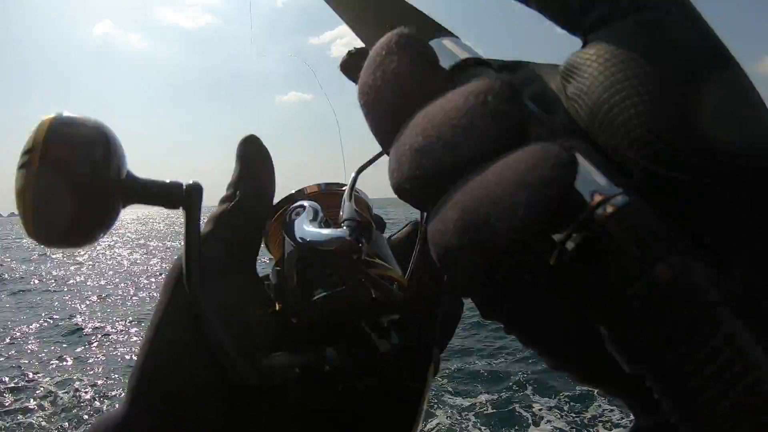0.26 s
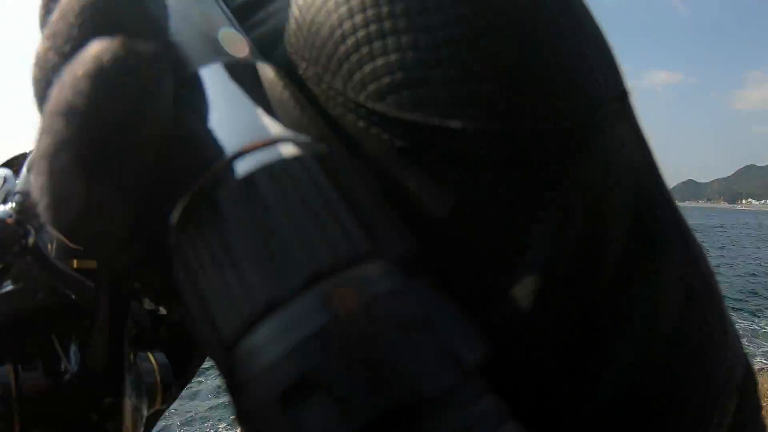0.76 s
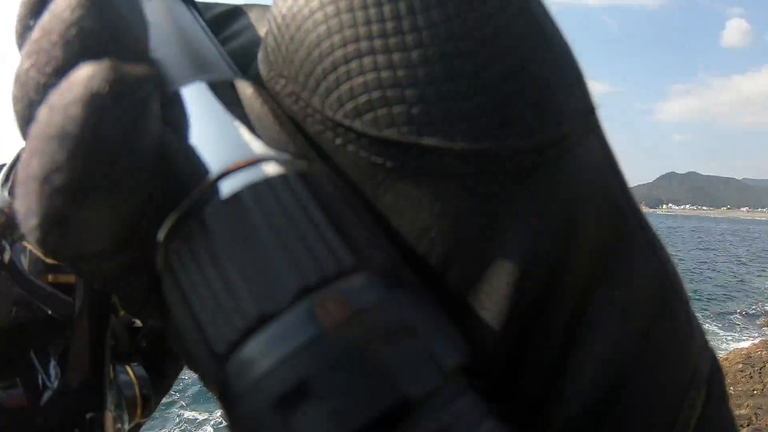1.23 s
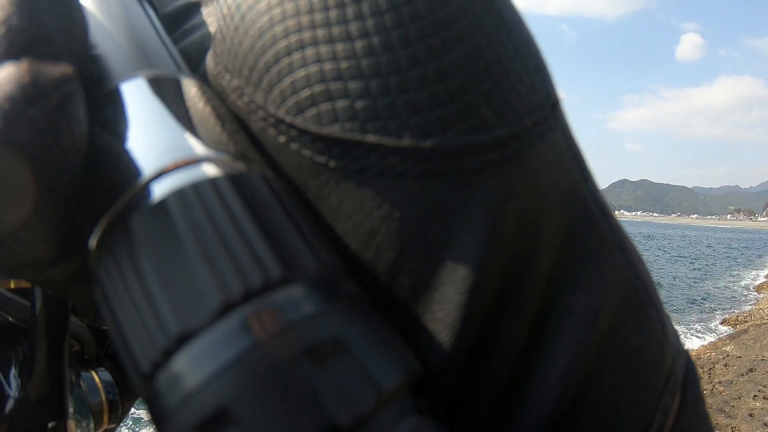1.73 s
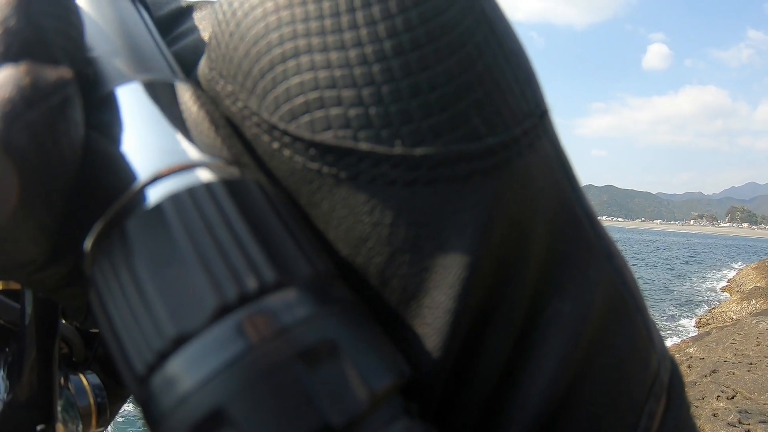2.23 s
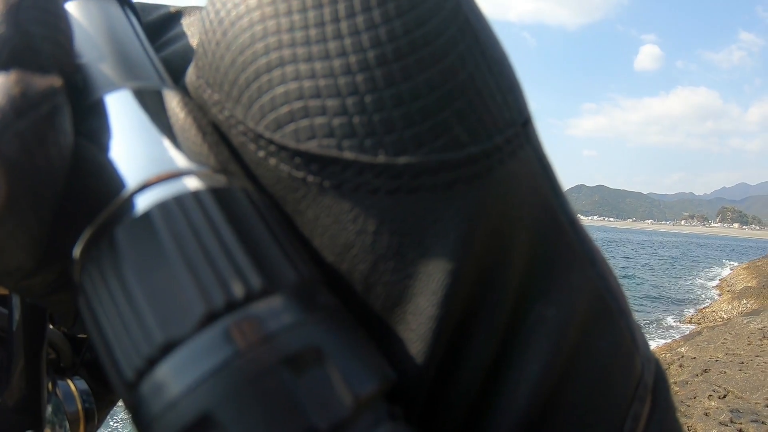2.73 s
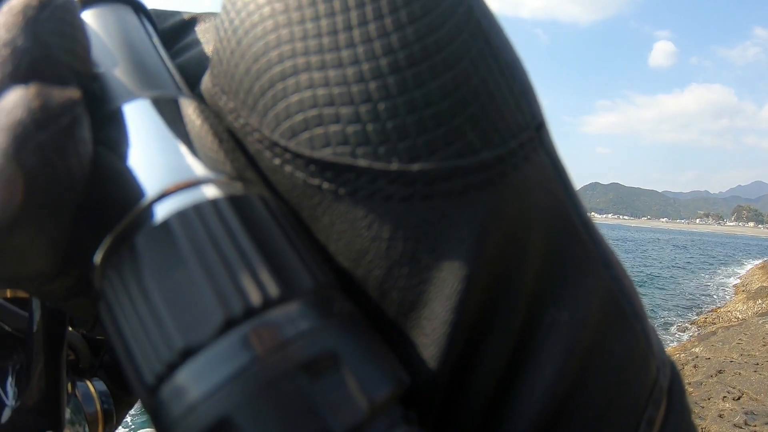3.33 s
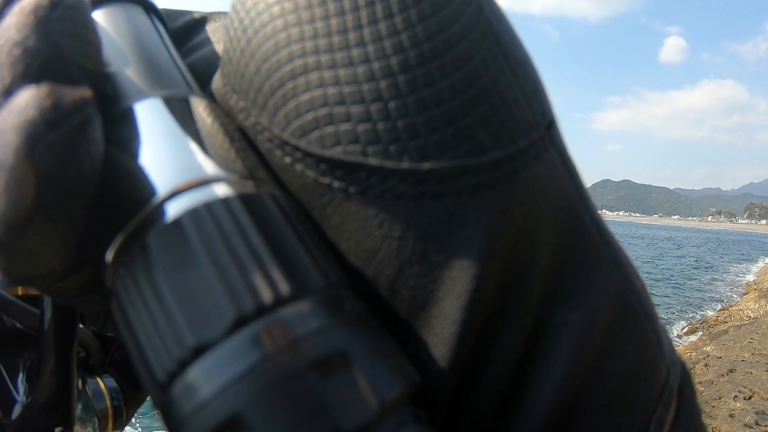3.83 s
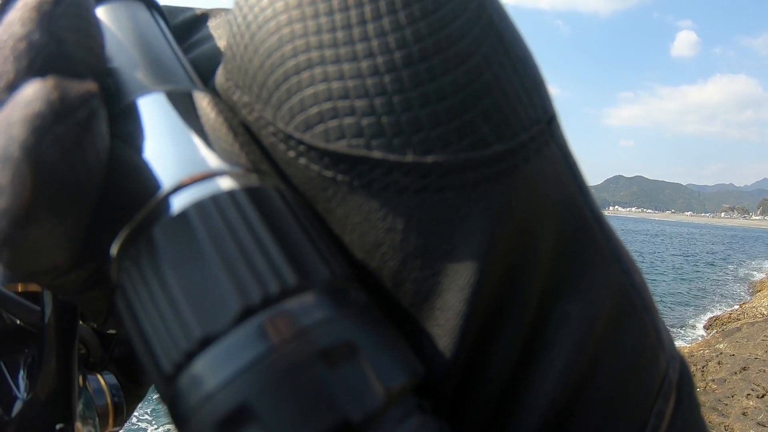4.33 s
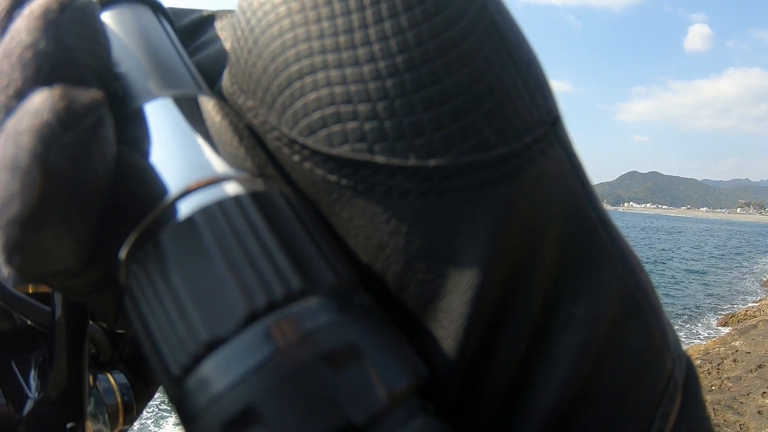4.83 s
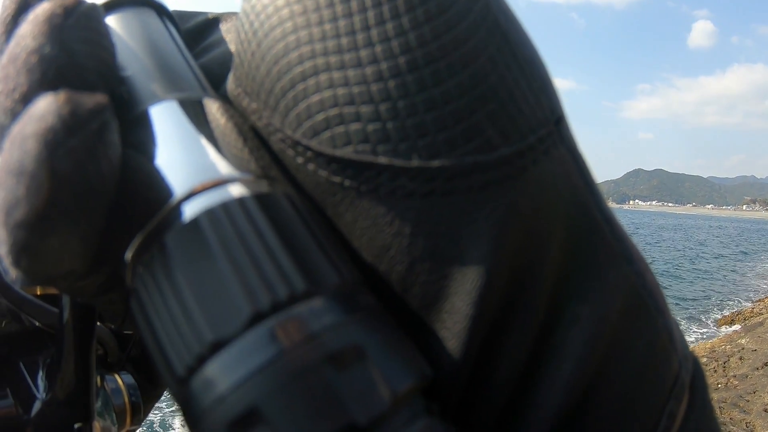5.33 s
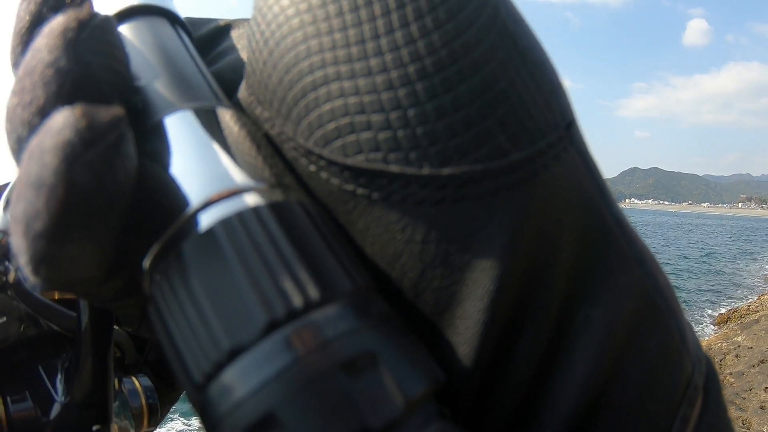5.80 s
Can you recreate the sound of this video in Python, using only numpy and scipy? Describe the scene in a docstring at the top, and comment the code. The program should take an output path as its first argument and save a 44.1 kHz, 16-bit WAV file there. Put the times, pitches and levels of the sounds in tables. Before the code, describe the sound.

Close, hollow knocks rattle the casing of a small body-worn camera as a fishing rod bumps it, ending in one hard blow with a faint metallic ring. Then surf dominates: a low watery roar, soft wash and fine fizz, with gurgles and round plops in rock hollows. It swells fullest midway, then eases. Wind buffets the microphone in low, uneven lumps throughout.

```python
"""Surf washes over a rocky shore: filtered noise layers under level curves, with chirping bubbles.
A fishing rod knocks on a small body-worn camera with two microphone ports: damped housing modes.
A metal part of the reel rings after the hardest knock, and wind buffets the ports with low noise.
A limiter briefly ducks the whole sound after hard blows.
"""
import sys
import numpy as np
from scipy import signal
from scipy.fft import rfft, irfft, next_fast_len
from scipy.io import wavfile
from scipy.ndimage import uniform_filter1d

SR = 44100
rng = np.random.default_rng(int(sys.argv[2]) if len(sys.argv) > 2 else 0)


def persist_wave(psi):
    """Save psi, clipped to +-1, as 16-bit WAV."""
    counts = np.round(np.clip(psi, -1, 1) * 32767).astype(np.int16)
    wavfile.write(sys.argv[1], SR, np.atleast_2d(counts).T)


N = 267246  # samples

# Spectra of roar, wash, foam fizz and spray: (frequency [Hz], relative density [dB])
ROAR_COLOUR = [(60, -38), (130, -1.5), (200, 1.5), (300, -2), (400, -1.5), (520, -2), (640, -9.5),
               (780, -15), (1000, -23), (1600, -31.5), (4000, -100)]
WASH_COLOUR = [(200, -57), (600, 5), (900, 3), (1200, -6), (1500, -5), (1900, -8), (2300, -15.5),
               (2900, -17.5), (3600, -21), (4400, -33), (9000, -79)]
FIZZ_COLOUR = [(1500, -61), (3000, -3), (4500, -2.5), (5500, 1.5), (6700, 3.5), (7600, -3.5), (8700, -19.5),
               (10800, -26), (16000, -87)]
SPRAY_COLOUR = [(3000, -49), (7000, -8.5), (8700, -5.5), (10800, -15), (13400, -23), (15500, -30)]
# Opening and closing of the roar's upper edge: (time [s], lift [dB])
ROAR_EDGE = [(0, 5), (.6, 3.5), (1.1, -3), (1.6, -1), (2.1, -0.5), (2.5, 3), (2.75, -0.5), (3.1, -0.5),
             (3.5, -4), (4.0, 0.5), (4.5, -1), (4.9, 3), (5.3, 3), (5.6, 2), (6.06, 1.5)]
# Share of the slap lift taken by roar, wash, fizz, spray [1]
SLAP_SHARES = [0.81, 0.58, 0.59, 0.91]
ROAR_EDGE_HZ = (540, 950)
FLICKER_RMS_DB = (0.99, 0.75, 0.97, 1.0)  # roar, wash, fizz, spray


def surf():
    """Breaking water as four noise bands, all lifted by the same splashes by their own shares."""
    roar = noise(ROAR_COLOUR, size=1024, patchy_db=1.0, patch_s=0.04, patch_hz=250)
    edge = signal.lfilter(*signal.butter(2, ROAR_EDGE_HZ, "band", fs=SR), roar)
    roar = roar + (gain_of(level_db(ROAR_EDGE, col=1)) - 1) * edge
    wash = noise(WASH_COLOUR, size=512, patchy_db=1.26, patch_s=0.036, patch_hz=700)
    fizz = noise(FIZZ_COLOUR, size=256, patchy_db=1.5, patch_s=0.026, patch_hz=1500)
    spray = noise(SPRAY_COLOUR, size=256, patchy_db=1.0, patch_s=0.047, patch_hz=1500)

    slaps_db, flicker = splashes()
    sea = np.zeros((2, N))
    layers = zip((roar, wash, fizz, spray), swells_db(), SLAP_SHARES, FLICKER_RMS_DB)
    for layer, swell_db, slap_share, flicker_db in layers:
        sea += layer * gain_of(swell_db + slap_share * slaps_db + flicker_db * flicker)
    return sea


# Swell of the sea: (time [s], roar level [dB], wash level [dB], fizz level [dB])
SURF = [(0.0, -36.5, -46.5, -56.5), (0.11, -35, -47.5, -56), (0.2, -31, -48, -59),
        (0.34, -30.5, -45.5, -55), (0.462, -43, -54.5, -65), (0.6, -35, -52.5, -66),
        (0.76, -38.5, -55.5, -69.5), (0.88, -35, -52, -68), (1.06, -40.5, -56.5, -69),
        (1.28, -38, -53.5, -65), (1.65, -36, -50, -62.5), (1.9, -38, -52.5, -65), (2.27, -38, -53, -67),
        (2.45, -35.5, -51, -62.5), (2.56, -36.5, -49.5, -61), (2.7, -36.5, -48.5, -60.5),
        (2.8, -35, -47.5, -61.5), (3.0, -30.5, -46.5, -56), (3.15, -31, -45.5, -55.5),
        (3.55, -29, -43, -52), (3.9, -33, -48.5, -58), (4.07, -36, -50, -58.5), (4.2, -32.5, -49.5, -61.5),
        (4.32, -37.5, -51, -63.5), (4.64, -37.5, -53.5, -64), (4.8, -37, -51, -63.5),
        (4.93, -34.5, -46.5, -58), (5.18, -35.5, -48.5, -58.5), (5.3, -36, -49, -59),
        (5.54, -36.5, -51, -62.5), (5.88, -35, -55, -65.5), (6.06, -40, -55, -66.5)]
# Heavier lumps of water landing, in the roar:
# (peak time [s], lift, negative = dip [dB], 1/e half length [s])
LUMPS = [(0.851, 4, 0.026), (1.547, 3, 0.055), (1.656, 6, 0.014), (2.016, 1.5, 0.026), (2.335, 6, 0.0097),
         (2.507, -4, 0.0068), (2.622, 6, 0.042), (2.747, 6, 0.018), (2.834, 9, 0.01), (2.92, 4, 0.027),
         (3.161, 9, 0.015), (3.405, 2.5, 0.15), (3.79, 4.5, 0.05), (4.024, 3.5, 0.038), (4.132, 5.5, 0.012),
         (4.347, 7.5, 0.013), (4.883, 2, 0.017), (5.116, -1, 0.048)]
SPRAY_DB, SPRAY_PER_FIZZ, MEAN_FIZZ_DB = -76, 1.23, -63.5  # spray swings more than the fizz
COVER_S, COVER_LENGTH_S, OPEN_DB = 0.75, 0.1, 4.5  # spray lift until a gloved hand shades the ports


def swells_db():
    """Levels of roar, wash, fizz and spray as the waves break."""
    t = np.arange(N) / SR
    roar, wash, fizz = (level_db(SURF, col=k) for k in (1, 2, 3))
    lumps = sum(db * np.exp(-((t - s) / length_s) ** 2) for s, db, length_s in LUMPS)
    unshaded = OPEN_DB * np.clip((COVER_S - t) / COVER_LENGTH_S + 0.5, 0, 1)
    spray = SPRAY_DB + SPRAY_PER_FIZZ * (fizz - MEAN_FIZZ_DB) + unshaded
    return roar + lumps, wash, fizz, spray


# Small slaps of water on rock, peaking half a length after the start:
# (start [s], lift before the layer's share, negative = dip [dB], length [s])
SLAPS = [(0.771, 4, 0.01), (1.137, 7.5, 0.011), (1.249, 6.5, 0.017), (2.291, 9.5, 0.013),
         (2.32, 4.5, 0.011), (2.47, 2.5, 0.018), (2.507, 1.5, 0.028), (2.516, 4.5, 0.016),
         (2.578, 3, 0.0097), (2.66, 4, 0.026), (2.72, 3.5, 0.013), (2.87, 3.5, 0.0088), (3.081, 4.5, 0.022),
         (3.213, 3.5, 0.0045), (3.351, 5.5, 0.0095), (3.602, 3.5, 0.0058), (4.052, -3, 0.0058),
         (4.43, 7, 0.012), (4.501, 8, 0.011), (4.67, -4, 0.0092), (5.028, 5, 0.016), (5.46, 1.5, .012)]


def splash_shape(u):
    """Quick rise to 1 at u = 1, slower fall."""
    u = np.maximum(u, 0)
    return u * np.exp(1 - u)


def splashes(per_s=76.0, rise_s=0.0032):
    """Slap lifts in dB, and an rms-1 flicker of random small splashes, common to all layers."""
    t = np.arange(N) / SR
    slaps_db = sum(db * splash_shape(2 * (t - s) / length_s) for s, db, length_s in SLAPS)
    drops = rng.uniform(0.16, 2.9, N) * (rng.random(N) < per_s / SR)
    flicker = signal.oaconvolve(drops, splash_shape(t[:SR // 10] / rise_s))[:N]
    return slaps_db, evened(flicker - flicker.mean())


# Single plops in hollows of the rock: (time [s], level [dB], starting pitch [Hz])
PLOPS = [(0.837, -29, 369), (0.869, -37, 394), (1.135, -42, 528), (1.474, -25.5, 368), (1.559, -23.5, 370),
         (2.317, -26.5, 480), (2.464, -25, 440), (2.508, -18.5, 460), (2.594, -23, 520),
         (2.624, -20.5, 424), (2.668, -22.5, 566), (2.686, -22, 520), (2.717, -19, 510), (2.754, -28, 397),
         (2.968, -28, 353), (3.15, -23, 457), (3.33, -29, 437), (3.511, -25, 465), (4.041, -35, 552),
         (4.138, -25, 348), (4.19, -31, 433), (4.244, -21.5, 357), (4.309, -22, 390), (4.344, -36, 470),
         (4.514, -25.5, 363), (4.658, -33, 560), (4.715, -27, 387), (4.839, -42, 388), (4.889, -26, 463),
         (4.919, -24, 430), (5.278, -47, 395), (5.323, -29, 460)]
# Splashes bursting into small bubbles:
# (start [s], level of one bubble [dB], centre starting pitch [Hz], length [s])
BURSTS = [(0.608, -47, 1700, .04), (1.234, -50, 1900, 0.043), (2.292, -51, 1500, .03),
          (2.47, -54, 1600, .04), (2.51, -38, 1390, .022), (2.653, -43, 1500, .05), (2.868, -47, 1500, .05),
          (3.073, -48, 1500, .06), (3.32, -48, 1600, .06), (4.12, -49, 1700, .1), (4.83, -41, 1220, .06),
          (4.9, -56, 1700, 0.11), (5.02, -55, 2200, .04), (5.16, -49, 1910, .03), (5.205, -51, 1600, .03),
          (5.31, -49, 1700, 0.035), (5.54, -49, 1200, .04)]
BURST_BUBBLES, BURST_OCTAVES = 14, 0.6  # bubbles per burst, pitch spread each way
GURGLES_PER_S, GURGLE_DB, GURGLE_HZ = 120, -11, (328.3, 800)  # dB re roar swell
FIZZLES_PER_S, FIZZLE_DB, FIZZLE_HZ = 200, -10, (900, 3300)  # dB re wash swell


def gurgles():
    """Air bubbles: scattered ones follow roar and wash; plops and bursts come at set times."""
    roar_db, wash_db = swells_db()[:2]
    large = scattered(GURGLES_PER_S, *GURGLE_HZ) * gain_of(roar_db + GURGLE_DB)
    small = scattered(FIZZLES_PER_S, *FIZZLE_HZ) * gain_of(wash_db + FIZZLE_DB)
    water = (large + small)[None]
    for s, db, hz in PLOPS:
        add(water, s, gain_of(db) * bubble(hz)[None])
    for s, db, centre_hz, length_s in BURSTS:
        for late, high in rng.random((BURST_BUBBLES, 2)):
            hz = centre_hz * 2 ** (BURST_OCTAVES * (2 * high - 1))
            add(water, s + late * length_s, gain_of(db) * bubble(hz)[None])

    size = next_fast_len(N)
    left = left_port(np.fft.rfftfreq(size, 1 / SR))
    middle = abs(1 + left) / 2  # levels refer to the mean of both ports
    return irfft(rfft(water, size) * [left / middle, 1 / middle], size)[:, :N]


GURGLE_SPREAD_DB = 2.5  # scale of the exponential spread


def scattered(per_s, low_hz, high_hz):
    """Bubbles of random strength and pitch at random moments, lower ones louder, rms 1."""
    spread_db = GURGLE_SPREAD_DB * np.minimum(rng.exponential(1, N), 4)
    strikes = gain_of(spread_db) * (rng.random(N) < per_s / SR)
    kind = rng.integers(0, 16, N)
    out = np.zeros(N)
    for k, hz in enumerate(np.geomspace(low_hz, high_hz, num=16)):
        out += signal.oaconvolve(strikes * (kind == k), bubble(hz) * low_hz / hz)[:N]
    return evened(out)


PLOP_CYCLES = 19.4  # cycles of the starting pitch to fall 60 dB
PLOP_CHIRP = 0.13  # pitch climbs by twice this share meanwhile


def bubble(hz):
    """A short dying tone that climbs as the air pocket shrinks."""
    cycle = np.arange(0, PLOP_CYCLES, hz / SR)
    progress = cycle / PLOP_CYCLES
    envelope = np.minimum(cycle, 1) * gain_of(-60 * progress)
    return envelope * np.sin(2 * np.pi * cycle * (1 + PLOP_CHIRP * progress))


# Blows on the housing: (time [s], crack level [dB], most strongly struck frequency [Hz],
# lean to the second mode set [dB], crack pitch factor [1], tick level [dB], tick pitch factor [1],
# tick edge level [dB], thump level [dB], thump frequency [Hz], thump t60 [s])
KNOCKS = [(0.106, -21, 600, 4, 0.98, -37, 1.2, 9, -0.5, 202, 0.045),
          (0.1315, -4.5, 1100, 0, 1.08, -12, 1.01, -5, 15, 195, 0.028),
          (0.188, -15, 900, 0, 0.98, -22.5, 1.0, 1, 6, 198, 0.052),
          (0.2225, -14, 800, 4, 0.93, -34, .95, -4, 6.5, 195.4, 0.071),
          (0.2317, -4.5, 800, 3, 1.05, -24, .93, 0, 10, 210, 0.045),
          (0.2654, -9, 850, 3.5, 1.02, -24, .96, -8, 10.5, 173, 0.034),
          (0.292, -11, 1100, -1, 1, -17.5, 0.99, 2.5, 8, 182, 0.08),
          (0.302, -15, 650, 6, .99, -51, .9, 0, 10, 190, 0.044),
          (0.5152, -2, 1000, 6, 1.03, -14.5, 0.99, -1, 15, 166, 0.027),
          (0.533, -20, 700, -2, 0.68, -49, .97, 0, 5.5, 200, 0.038),
          (1.8819, -20.5, 600, 1, 0.99, -46, .81, 0, 4.5, 201, 0.038)]
# Housing modes before the pitch factor:
# (frequency [Hz], level [dB], t60 [s], weight of the lean: first set < 0, second set > 0 [1])
CRACK = [(470, -5, 0.039, -1.3), (660, 7.5, 0.023, -0.93), (763, -2.5, 0.035, 0.75),
         (1000, 9, 0.0095, -0.91), (1140, -0.5, 0.02, 0.77), (1376, 3, 0.036, -1.14),
         (1614, -5, 0.011, -0.5)]
# Lower and upper contact modes before the pitch factor: (frequency [Hz], level [dB], t60 [s])
TICK = [(2614, 0.5, 0.013), (2760, -17, 0.026), (2870, -4.5, 0.014)]
TICK_EDGE = [(3540, -17, 0.017), (4060, -11.5, 0.0096), (4480, -18, 0.013), (6400, -23, .01),
             (8500, -26, 0.0067), (11500, -43, .006)]
# Metal reel part: (frequency [Hz], level [dB], t60 [s])
RING = [(1243, -33.5, 0.4), (1290, -41, 0.25)]
RING_S = 0.518
FOCUS_DB = 4.5  # loss one octave from the most strongly struck frequency
CRACK_TOP_HZ = 1740  # the rubbery contact excites little above this
CRACK_LEFT_DB, CRACK_LEFT_DB_PER_OCTAVE = 2, 5  # left re right at CRACK_TOP_HZ, and its slope
TICK_LEFT_DB, THUMP_LEFT_DB = -1.5, -20  # left re right
CRACK_LEAD_RAD, TICK_LEAD_RAD = 2.58, 1.56  # left re right
THUMP_LAG_S = 0.0013  # the mount yields a moment after the contact
PUSH_HZ, PUSH_DB, PUSH_T60_S = 106, -8.5, 0.04  # low shove, dB re thump


def knocks():
    """Blows tick and crack the housing, the camera rocks on its mount, and a reel part rings."""
    out, t = np.zeros((2, N)), np.arange(SR // 8) / SR
    soft = signal.butter(2, CRACK_TOP_HZ, fs=SR)
    push = modes([(PUSH_HZ, PUSH_DB, PUSH_T60_S)], t, rise_s=0.0053)
    for (s, crack_db, struck_hz, lean_db, crack_pitch, tick_db, tick_pitch, edge_db,
         thump_db, thump_hz, thump_t60_s) in KNOCKS:
        left, right = [], []
        for hz, db, t60_s, side in CRACK:
            right_db = db + side * lean_db - FOCUS_DB * np.log2(hz / struck_hz) ** 2
            left_re_right_db = CRACK_LEFT_DB + CRACK_LEFT_DB_PER_OCTAVE * np.log2(hz / CRACK_TOP_HZ)
            right.append((hz, right_db, t60_s))
            left.append((hz, right_db + left_re_right_db, t60_s))
        crack = [modes(left, t, crack_pitch, rise_s=0.00057, lead_rad=CRACK_LEAD_RAD),
                 modes(right, t, crack_pitch, rise_s=0.00057)]
        add(out, s, -gain_of(crack_db) * signal.lfilter(*soft, crack))

        contact = TICK + [(hz, db + edge_db, t60_s) for hz, db, t60_s in TICK_EDGE]
        tick = [modes(contact, t, tick_pitch, rise_s=0.0011, lead_rad=lead)
                for lead in (TICK_LEAD_RAD, 0)]
        add(out, s, gain_of([[tick_db + TICK_LEFT_DB], [tick_db]]) * tick)

        thump = modes([(thump_hz, 0, thump_t60_s)], t, rise_s=0.0045) - push
        opposed = np.array([-thump, thump])
        add(out, s + THUMP_LAG_S, gain_of([[thump_db + THUMP_LEFT_DB], [thump_db]]) * opposed)

    ring_t = np.arange(SR // 2) / SR
    ring = [modes(RING, ring_t, rise_s=0.004, lead_rad=lead) for lead in (CRACK_LEAD_RAD, 0)]
    add(out, RING_S, np.array(ring))
    return out


def modes(table, t, pitch=1, rise_s=0.001, lead_rad=0):
    """Resonances as exponentially dying sines with a soft start."""
    rings = sum(gain_of(db - 60 * t / t60_s) * np.sin(2 * np.pi * hz * pitch * t + lead_rad)
                for hz, db, t60_s in table)
    return rings * (1 - np.exp(-(t / rise_s) ** 2))


# Spectra of buffeting and flutter: (frequency [Hz], relative density [dB])
WIND_COLOUR = [(8, -24), (20, 5), (35, 1.5), (55, 3), (80, -7), (150, -36), (600, -100)]
FLUTTER_COLOUR = [(30, -50), (60, -2), (100, -3), (150, -6), (200, -8), (400, -65), (1000, -100)]


def wind():
    """Lumpy low pressure swings at the ports, with a quicker flutter in the gusts."""
    buffet = noise(WIND_COLOUR, size=4096, patchy_db=1.5, patch_s=0.06, patch_hz=30)
    flutter = noise(FLUTTER_COLOUR, size=2048, patchy_db=1.5, patch_s=0.05, patch_hz=60)
    return gusts(col=1) * buffet + gusts(col=2) * flutter


# Gusts on the ports: (peak time [s], buffeting level [dB], flutter level [dB], half length [s])
GUSTS = [(0.0, -28, -36, 0.15), (0.104, -22.5, -27.5, 0.021), (0.27, -27, -31, 0.12),
         (0.39, -44, -47, 0.053), (0.642, -37, -48, 0.016), (0.837, -58, -31.5, 0.095),
         (0.997, -34.5, -43, 0.093), (1.295, -44, -36, 0.18), (1.502, -26.5, -55, 0.023),
         (1.643, -30.5, -54, 0.081), (1.796, -29.5, -30, 0.049), (2.007, -33, -29.5, 0.11),
         (2.177, -34, -31, .08), (2.345, -28, -29.5, 0.068), (2.495, -28.5, -48, 0.16),
         (2.669, -21, -49, 0.035), (2.849, -31, -27, 0.023), (2.89, -22, -44, 0.033),
         (3.125, -24, -27, 0.11), (3.252, -38, -29, 0.021), (3.445, -43, -23.5, 0.043),
         (3.53, -35, -25.5, 0.027), (3.66, -24.5, -23.5, 0.081), (3.733, -38, -21, 0.012),
         (3.81, -27, -48, 0.03), (3.853, -39, -27.5, 0.055), (3.93, -31, -38, 0.018),
         (4.102, -34, -32.5, 0.091), (4.323, -34.5, -39.5, 0.04), (4.635, -28.5, -37, 0.048),
         (4.744, -24.5, -42, 0.046), (4.898, -33, -53, 0.029), (4.974, -33.5, -40, 0.036),
         (5.128, -25, -27, 0.059), (5.336, -30, -38, 0.082), (5.42, -38, -35, 0.026),
         (5.61, -38, -33.5, 0.06), (5.774, -38, -37, 0.035), (5.92, -19.5, -35, 0.047),
         (6.062, -24, -28, 0.049)]
LULL_DB = (-53, -42.5)  # buffeting, flutter between gusts
GUST_EDGE_DB, GUST_POINT = -7.5, 1.6  # drop one half length from the peak, exponent of the drop


def gusts(col):
    """Gain of one wind layer: gust powers add to the lull, each falling away on both sides."""
    t = np.arange(0, N + 64, 64) / SR
    power = gain_of(2 * LULL_DB[col - 1])
    for row in GUSTS:
        drop_db = GUST_EDGE_DB * abs((t - row[0]) / row[-1]) ** GUST_POINT
        power = power + gain_of(2 * (row[col] + drop_db))
    return np.interp(np.arange(N) / SR, t, np.sqrt(power))


# Left port re right:
# (frequency [Hz], likeness 0-1 [1], phase lead [rad], level [dB])
PORTS = [(40, .93, -.4, -5), (100, .94, -.1, -9), (200, .88, .2, -12), (300, .9, 1.2, -13.5),
         (400, .93, 1.9, -11), (500, .95, 2.4, -7), (610, .95, 2.8, -4), (780, .87, 3.2, -3.5),
         (1000, .76, 2.9, -3.5), (1500, .73, 1.7, -2), (2300, .5, .4, -2.5), (2900, .6, .8, -1.5),
         (4500, .4, -.6, -7), (5600, .5, -2, -5.5), (7000, .45, -.6, -5), (8700, .55, 0, -.5),
         (13000, .88, 0, 0)]


def left_port(hz):
    """Complex gain of the left port against the right."""
    return gain_of(read(PORTS, hz, col=3)) * np.exp(1j * read(PORTS, hz, col=2))


def noise(colour, size, patchy_db, patch_s, patch_hz):
    """Random short-time spectra with drifting patches at two partly alike ports; mean has rms 1."""
    hop, hz = size // 4, np.fft.rfftfreq(size, 1 / SR)
    frames = N // hop + 5
    a, b, c, d, patches = rng.standard_normal((frames, len(hz), 5)).T
    span = max(round(patch_s * SR / hop), 1)
    width = max(round(patch_hz * size / SR), 1)
    patches = evened(uniform_filter1d(uniform_filter1d(patches, width, 0), span, 1))

    likeness = np.clip(read(PORTS, hz), 0, 1)[:, None]
    right = a + 1j * b
    left = likeness * right + np.sqrt(1 - likeness ** 2) * (c + 1j * d)
    left = left * left_port(hz)[:, None]
    spectra = np.array([left, right]) * gain_of(read(colour, hz)[:, None] + patchy_db * patches)
    out = signal.istft(spectra, nperseg=size, noverlap=size - hop)[1][:, :N]
    return out / np.sqrt(np.mean(out.mean(0) ** 2))


def gain_of(db):
    """Decibels to amplitude gain."""
    return 10 ** (np.asarray(db) / 20)


def evened(x):
    """Scales to rms 1."""
    return x / np.sqrt(np.mean(x ** 2) + 1e-20)


def read(points, hz, col=1):
    """A table column, interpolated on a log-frequency axis."""
    table = np.transpose(points)
    return np.interp(np.log(hz + 1), np.log(table[0] + 1), table[col])


def level_db(table, col):
    """A dB column, interpolated at every sample."""
    table = np.transpose(table)
    return np.interp(np.arange(N) / SR, table[0], table[col])


def add(mix, s, sound):
    """Mixes a sound in at s seconds, cut at the end of the mix."""
    part = mix[:, round(s * SR):][:, :sound.shape[1]]
    part += sound[:, :part.shape[1]]


def scene():
    """Sea, bubbles, knocks and wind."""
    return surf() + gurgles() + knocks() + wind()


SENSE_HZ, THRESHOLD_DB, DUCK_SHARE = 410, -18.0, 0.67  # senses above the wind
ATTACK_S, RECOVERY_DB_PER_S = 0.0021, 114.0  # recovery of the sensed level
EDGE_HZ = 15700


def record(dry):
    """A limiter with a lagging attack and a steady dB recovery, then a low-pass band limit."""
    sensed = signal.lfilter(*signal.butter(1, SENSE_HZ, "high", fs=SR), dry)
    louder_power = (sensed ** 2).max(0)
    power_db = 10 * np.log10(abs(uniform_filter1d(louder_power, 110)) + 1e-12)
    fall_db = np.arange(N) * RECOVERY_DB_PER_S / SR
    held_db = np.maximum.accumulate(power_db + fall_db) - fall_db
    over_db = np.maximum(held_db - THRESHOLD_DB, 0)
    lag = np.exp(-1 / (ATTACK_S * SR))
    duck_db = DUCK_SHARE * signal.lfilter([1 - lag], [1, -lag], over_db)
    band_limit = signal.firwin(511, EDGE_HZ, window=("kaiser", 9), fs=SR)
    return signal.oaconvolve(dry / gain_of(duck_db), band_limit[None], "same")


dry = scene()
out = record(dry)
persist_wave(out)
```